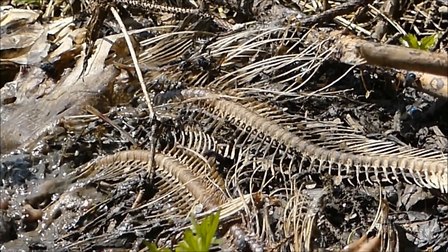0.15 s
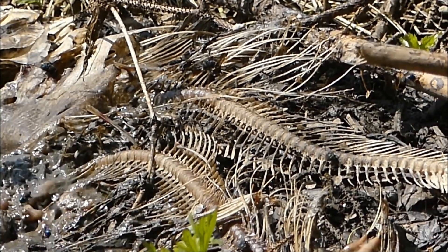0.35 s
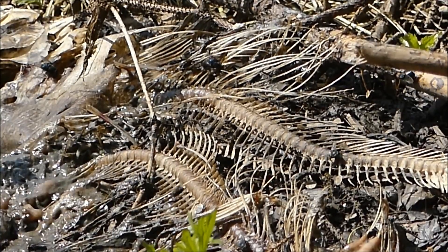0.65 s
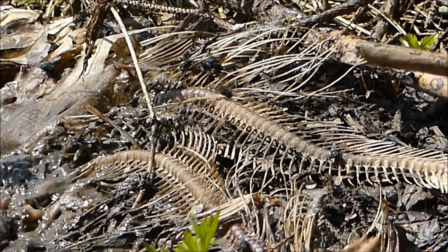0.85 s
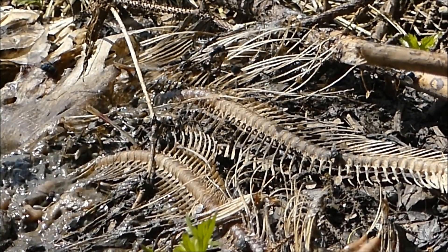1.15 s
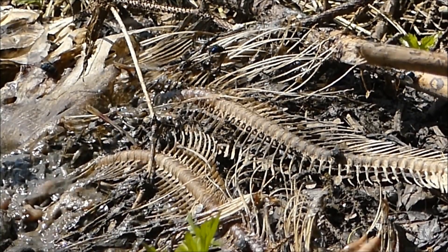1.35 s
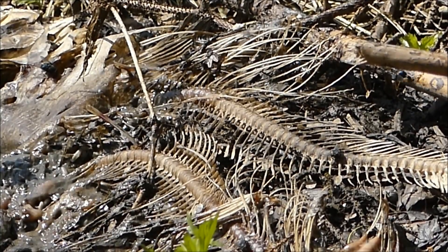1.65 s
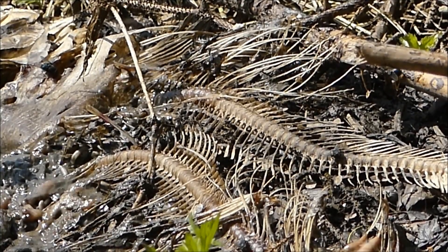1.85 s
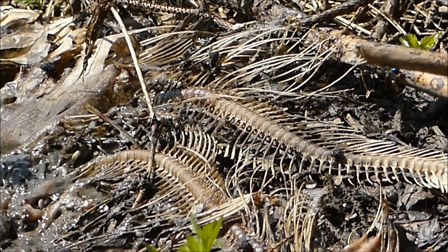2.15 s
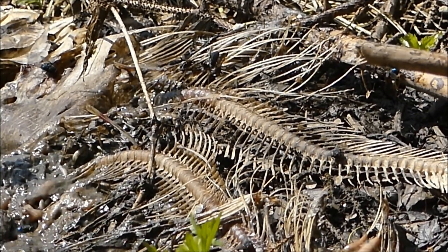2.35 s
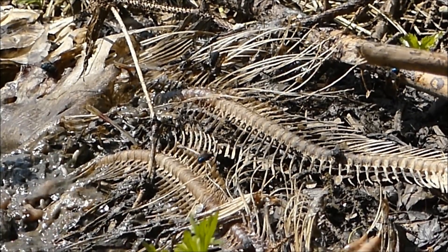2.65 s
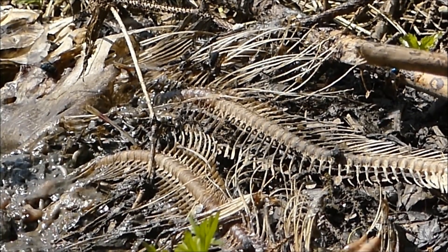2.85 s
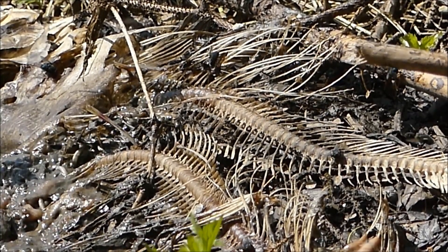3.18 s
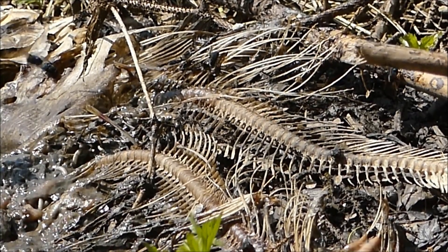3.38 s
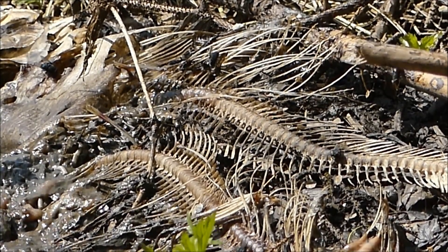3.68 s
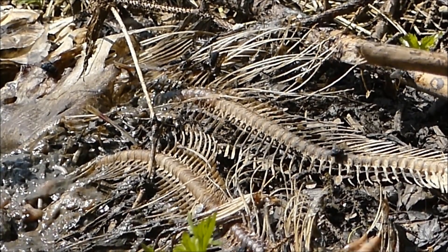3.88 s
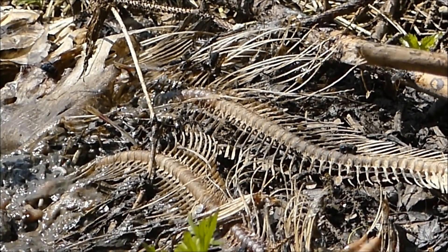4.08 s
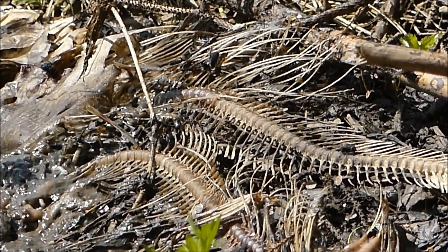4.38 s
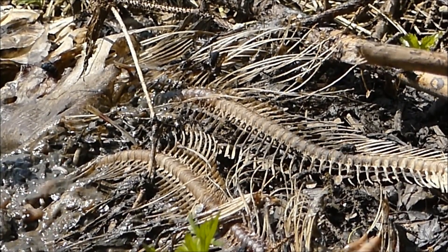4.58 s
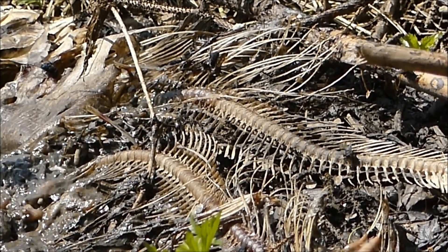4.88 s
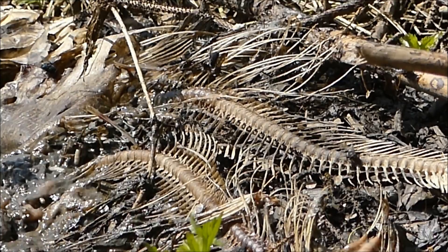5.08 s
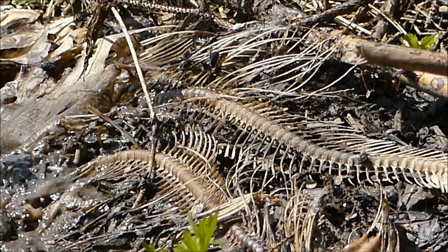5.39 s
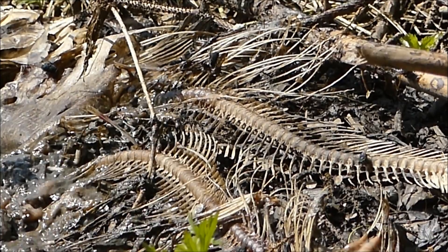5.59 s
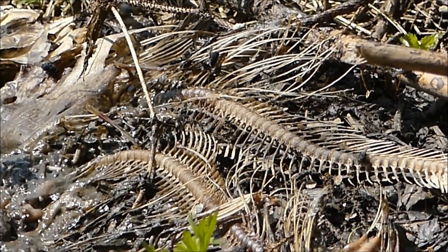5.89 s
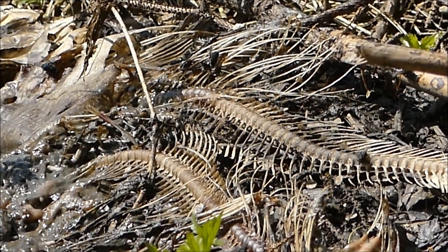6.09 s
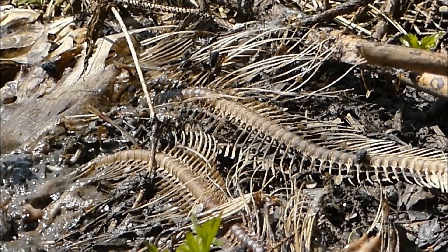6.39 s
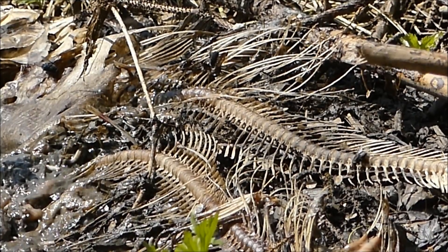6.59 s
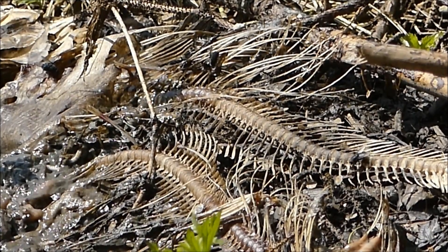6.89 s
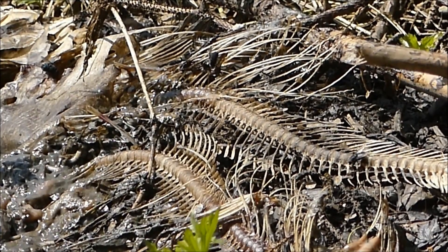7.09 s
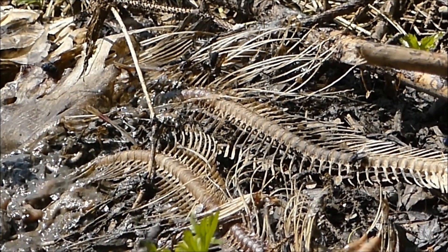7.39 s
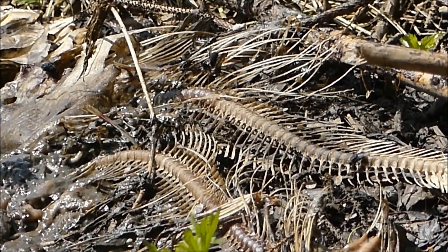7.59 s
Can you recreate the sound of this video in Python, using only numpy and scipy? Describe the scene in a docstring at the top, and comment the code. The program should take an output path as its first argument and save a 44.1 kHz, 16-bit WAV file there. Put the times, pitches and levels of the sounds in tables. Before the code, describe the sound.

In an open wood, a raspy raven and a close, louder raven give short croaks during the first few seconds, one followed by a brief ringing echo. Thin, gliding whines of other birds overlap them above a blurred distant flock. A tiny snap ticks early in wet litter. Later a third raven rattles from farther away. Light breeze puffs bump the microphone near the ground, over soft hiss.

```python
"""A light breeze puffs at a microphone near the ground, over the din of distant birds and a soft hiss.
Thin arching whines of other birds swell and fall; among them one raven rasps, a snap ticks in the wet litter
and a close raven croaks, once with a short ringing echo; later a third rattles from farther off, and faint
croaks come from deeper in the wood. Whines are gliding harmonics, croaks a chopped harmonic voice through
throat and bill, wind short low bursts; the trees throw bird voices back as sparse echoes."""
import sys
import numpy as np
from scipy import signal
from scipy.fft import rfft, irfft, next_fast_len
from scipy.io import wavfile
from scipy.ndimage import map_coordinates

SR = 44100
rng = np.random.default_rng(int(sys.argv[2]) if len(sys.argv) > 2 else 0)


def inscribe(sig):
    """Save sig as 16-bit PCM at rate SR to the path in sys.argv[1].

    A 1-D sig is mono; a 2-D sig holds one channel per row.
    Samples are clipped to [-1, 1] before scaling.
    """
    pcm = np.round(np.clip(np.atleast_2d(sig).T, -1, 1) * 32767)
    wavfile.write(sys.argv[1], SR, pcm.astype(np.int16))


N = 341334
TIME_S = np.arange(N) / SR

# level of the distant flock, before the gains of its users: time_s, level_db
DIN_LEVEL = [(2.1, -46), (4.1, -46), (5.5, -48.5), (6.4, -52.5), (7.2, -49), (7.74, -52)]
# relative spectrum of distant voices: freq_hz, gain_db
DIN_COLOUR = [(250, -38), (450, -6), (750, -4), (1150, 4), (1500, -8), (2050, -12), (2600, -9), (3200, -16),
              (5000, -24), (14000, -38.5)]

# voice of the rasping bird, also used for the distant croaks; see croak()
RASPING_VOICE = dict(
    top_at=0.557, scoop=0.04766, sag=0.0914, glide=0.36, jitter=0.0553, swing=0.16,
    last_rattle_hz=55.9, stagger=0.22, depth=(0.55, 0.48), rough=(0.42, 0.5),
    swell_db=-0.5, fade_db=5.5, uneven_db=1.5, attack_s=0.016,
    open_db=7.5, shut_db_per_s=60, ring_db=4, ring_width_hz=600)


def amp(db):
    """Decibels to gain."""
    return 10 ** (np.asarray(db) / 20)


def evened(x):
    """Scales to rms 1."""
    return x / np.sqrt(np.mean(x ** 2) + 1e-20)


def follow(rows, t_s):
    """Each column of a curve at the times t_s."""
    s, *columns = np.transpose(rows)
    return [np.interp(t_s, s, c) for c in columns]


def read(points, hz):
    """A spectrum interpolated on a log-frequency axis."""
    f, value = np.transpose(points)
    return np.interp(np.log(hz + 1), np.log(f + 1), value)


def colour(x, points):
    """Filters by a spectrum in dB."""
    size = next_fast_len(2 * len(x))
    gain = amp(read(points, np.fft.rfftfreq(size, 1 / SR)))
    return irfft(rfft(x, size) * gain, size)[:len(x)]


def band(x, hz, kind):
    """Steep zero-phase low-, high- or band-pass."""
    return signal.sosfiltfilt(signal.butter(4, hz, kind, fs=SR, output="sos"), x)


def wander(size, hz):
    """Smooth chance of rms 1 that changes about hz times a second."""
    at = np.arange(size) * 2 * hz / SR
    return evened(map_coordinates(rng.standard_normal(int(at[-1]) + 4), [at + 1], order=2))


def add(mix, start_s, sound):
    """Mixes a sound in at start_s."""
    part = mix[max(round(start_s * SR), 0):][:len(sound)]
    part += sound[:len(part)]


def arch(share, top_at, before, after, bend=2.18):
    """How far a gesture lies below its top: by before at its start, by after at its end."""
    top_at = np.clip(top_at, 0.05, 0.95)
    rising = np.maximum(1 - share / top_at, 0) ** bend
    falling = np.maximum((share - top_at) / (1 - top_at), 0) ** bend
    return before * rising + after * falling


def warp(x, speed):
    """Resamples along a curve of speed ratios, which moves pitch and resonances together."""
    return map_coordinates(x, [np.cumsum(speed)], order=3)


def resonate(x, hz, width_hz):
    """A one-pole resonance of gain 1 that follows the curve hz."""
    turn = np.exp(2j * np.pi * np.cumsum(hz) / SR)
    r = np.exp(-np.pi * width_hz / SR)
    return 2 * (turn * signal.lfilter([1 - r], [1, -r], x / turn)).real


def background(din_db=-3, flutter_db=(3, 2.6, 1), hiss_db=-1):
    """The blurred din of the distant flock, each register swelling by itself, over a soft hiss."""
    # time_s, level_db (before hiss_db)
    hiss_level = [(4.18, -60), (4.23, -65), (5.8, -62), (5.95, -66), (7.74, -68.5)]
    # relative spectrum: freq_hz, gain_db
    hiss_colour = [(30, -13), (120, 14.5), (300, -33), (3000, -4), (7500, -6.5), (9800, 7.5), (12000, 3),
                   (15500, 1.5)]
    din = evened(colour(rng.standard_normal(N), DIN_COLOUR))
    low, high = band(din, 850, "low"), band(din, 1900, "high")
    registers = (low, din - low - high, high)
    din = sum(part * amp(db * np.minimum(wander(N, 20), 1)) for part, db in zip(registers, flutter_db))
    hiss = evened(colour(rng.standard_normal(N), hiss_colour))
    din_gain = amp(follow(DIN_LEVEL, TIME_S)[0] + din_db)
    hiss_gain = amp(follow(hiss_level, TIME_S)[0] + hiss_db)
    return din * din_gain + hiss * hiss_gain


def puff(hz, scale_s):
    """A swell of air only a few cycles long, fullest at twice scale_s."""
    u = np.arange(SR // 20) / SR / scale_s
    turns = rng.random() + np.cumsum(hz * (1 + 0.17 * wander(len(u), 219.0))) / SR
    return (u / 2) ** 2 * np.exp(2 - u) * np.sin(2 * np.pi * turns)


def breeze(eddy_db=-2, lump_db=5.0, puff_db=-2, small_db=5.0, spread_db=8,
           low_hz=370, high_hz=520, count=300, thud_hz=170, thud_db=-9):
    """Lumpy low eddies at the microphone, with strong, thudding puffs and many small ones."""
    # strength of the breeze, before the gains above: time_s, level_db
    strength = [(0, -57), (.33, -74.5), (1.64, -79), (2.45, -53.5), (2.76, -66.5), (3.34, -53), (4.12, -65),
                (4.27, -48), (4.94, -58.5), (6.45, -51), (6.85, -64), (6.9, -56.5)]
    # relative eddy spectrum: freq_hz, gain_db
    eddy_colour = [(55, -39), (100, -8.5), (165, 2), (290, -16), (440, -5), (700, -47), (1500, -78)]
    # strongest puffs: start_s, level_db (before puff_db), centre_hz
    strong_puffs = [(0.038, -35.5, 216), (.333, -41.5, 340), (2.289, -39.5, 383), (2.563, -35.5, 234),
                    (2.588, -34, 192), (2.998, -36, 447), (3.946, -37, 396), (4.198, -31, 467),
                    (4.26, -30, 432), (4.289, -34.5, 330), (4.316, -29.5, 490), (4.353, -35, 480),
                    (4.414, -35, 490), (4.597, -34, 490), (5.118, -31.5, 396), (5.426, -32, 480),
                    (5.862, -28.5, 480), (6.105, -39, 412), (6.258, -45, 604), (6.324, -37.5, 169.2),
                    (6.428, -31, 495), (6.888, -30.5, 562), (6.918, -39.5, 485), (6.982, -36, 504),
                    (7.54, -34.5, 430)]
    strength_db = follow(strength, TIME_S)[0]
    lumps = amp(lump_db * np.minimum(wander(N, 35), 1.5))
    out = evened(colour(rng.standard_normal(N), eddy_colour) * lumps) * amp(strength_db + eddy_db)
    for start_s, db, hz in strong_puffs:
        thud = amp(thud_db) * puff(thud_hz, scale_s=0.0025)
        add(out, start_s, amp(db + puff_db) * (puff(hz, scale_s=0.0021) + thud))
    for when, height, size in rng.random((count, 3)):
        gain = amp(strength_db[int(when * N)] + small_db + spread_db * size ** 2)
        hz = low_hz + height * (high_hz - low_hz)
        add(out, when * N / SR, gain * puff(hz, scale_s=0.0017))
    return out


def whine(length_s, top_hz, fall, loudest_at, first_db, octave_db, third_db, scoop=0.012, quaver=0.0034,
          flutter_db=1.85, droop=0.049, rolloff_db=13, waver=0.00489, swell_db_per_s=90, fade_db=8):
    """A thin four-harmonic note that starts nearly level, swells, then arches down and droops as it fades."""
    u = np.linspace(0, 1, int(length_s * SR))
    # the pitch tops before the loudest moment
    hz = top_hz * (1 - arch(u, loudest_at - 0.205, scoop, fall, bend=1.5)) * (1 - droop * u ** 10)
    tremble = 1 + quaver * wander(len(u), 70.7) + waver * wander(len(u), 10.26)
    phase = 2 * np.pi * np.cumsum(hz * tremble) / SR
    harmonics_db = [first_db, octave_db, third_db, third_db - rolloff_db]
    tone = sum(amp(db + flutter_db * wander(len(u), 22.3)) * np.sin((k + 1) * phase)
               for k, db in enumerate(harmonics_db))
    swell = amp(-arch(u, loudest_at, swell_db_per_s * loudest_at * length_s, fade_db))
    return np.sqrt(2) * tone * swell * np.minimum(u / 0.063, 1) * np.minimum((1 - u) / 0.11, 1)


def far_whiners(count=60, low_hz=1090, high_hz=1430, length_s=0.22, fall=0.0613, loudest_at=0.405,
                harmonics_db=(-15, -20, -28)):
    """Faint whines at random times and pitches from deep in the wood, their level following the din's."""
    out = np.zeros(N)
    for when, height in rng.random((count, 2)):
        start_s, hz = when * N / SR, low_hz + height * (high_hz - low_hz)
        levels_db = follow(DIN_LEVEL, start_s)[0] + np.array(harmonics_db)
        add(out, start_s, whine(length_s, hz, fall, loudest_at, *levels_db))
    return out


def whines_and_ring():
    """Whines of the nearer birds, and at 2.17 s a short ringing echo of the close croak, as gliding notes."""
    # start_s, length_s, top_hz, fall (share of pitch), loudest_at (0-1),
    # first_db, octave_db, third_db (before flutter and swell)
    note_rows = [(0.251, 0.079, 1365, 0.024, 0.41, -53, -48, -82),
                 (0.412, 0.27, 1495, 0.1, 0.45, -47.5, -43.5, -60.5),
                 (.828, 0.22, 1253, 0.056, 0.28, -41.5, -40.5, -60.5),
                 (1.002, 0.21, 1493, 0.071, 0.76, -48.5, -41.5, -71),
                 (1.499, 0.25, 1527, 0.091, 0.24, -46, -38, -63),
                 (2.149, 0.16, 1500, 0.083, 0.35, -45, -43, -67),
                 (2.17, 0.06, 1165, 0.011, 0.9, -58, -72, -55),
                 (2.291, 0.091, 1187, 0.03, 0.78, -40.5, -52.5, -74),
                 (2.389, 0.094, 1147, 0.0072, 0.35, -39, -88, -81),
                 (2.41, .26, 1358, .11, 0.31, -46, -48.5, -84),
                 (2.519, 0.14, 1138, 0.06, 0.32, -76, -56, -55.5),
                 (2.52, 0.1, 1266, .05, 0.14, -63, -49.5, -69),
                 (2.895, 0.27, 1232, 0.15, 0.33, -44.5, -46.5, -64),
                 (2.9, 0.25, 1311, .08, 0.32, -50, -46, -58),
                 (3.03, 0.29, 1327, 0.023, 0.52, -48.5, -56.5, -84),
                 (3.58, 0.31, 1307, 0.05, 0.45, -49, -48, -62),
                 (3.68, 0.27, 1350, 0.069, 0.53, -48, -48.5, -75),
                 (3.87, .27, 1125, 0.039, 0.384, -47, -60, -62),
                 (5.037, 0.19, 1282, 0.081, 0.29, -41.5, -53.5, -67),
                 (5.12, 0.32, 1295, 0.075, 0.52, -64, -51.5, -68),
                 (5.89, 0.3, 1296, 0.06, 0.36, -60, -52.5, -67),
                 (6.28, .25, 1336, .06, 0.55, -64, -58.5, -76)]
    out = np.zeros(N)
    for start_s, *row in note_rows:
        add(out, start_s, whine(*row))
    return out


def twigs(x, count=7, spread_s=0.016, size=0.37):
    """Twigs scatter the short waves: a few quick echoes make the sound ragged."""
    out = x.copy()
    for delay, strength in rng.random((count, 2)):
        add(out, delay * spread_s, size * (0.5 + strength) * x)
    return out


def croak(row, throat, mouth, top_at, scoop, sag, last_rattle_hz, depth, rough, ring_db, swell_db, fade_db,
          open_db, shut_db_per_s, jitter, swing, uneven_db, glide, stagger, split=0, gape=0.72,
          half_open_db=-21, chest_rise_db=6, ring_width_hz=170, attack_s=0.005, release_s=0.0066):
    """A harmonic voice, chopped by a slower, uneven rattle of the syrinx and shaped by the throat and bill."""
    # scoop, sag: shares of the top pitch; depth, rough: (at start, at end); top_at: share of the croak
    start_s, length_s, peak_db, peak_at, bright_db, widest_at, chest_db, top_hz, rattle_hz, bill_hz = row
    t = np.arange(0, length_s, 1 / SR)
    size = len(t)
    share, past_widest_s = t / length_s, t - widest_at * length_s

    effort_db = peak_db - arch(share, peak_at, swell_db, fade_db, bend=1.28)
    # treble grows as the bill opens and dies as it shuts
    shut_db = shut_db_per_s * np.maximum(past_widest_s, 0)
    treble_db = bright_db - arch(share, widest_at, open_db, 0) - shut_db - effort_db
    hz = top_hz * (1 - arch(share, top_at, scoop, sag, bend=2.088))
    depth, rough = np.linspace(*depth, size), np.linspace(*rough, size)

    rattle = np.linspace(rattle_hz, last_rattle_hz, size) * (1 + stagger * wander(size, 49.68))
    beat = np.cumsum(rattle) / SR % 1
    burst = np.sin(np.pi * beat ** 0.62) ** 2  # each beat opens faster than it closes
    burst /= burst.mean()

    # the pitch chirps down as the pressure of each beat runs out
    chirp = swing * depth * 2 * (0.38 - beat)
    turns = np.cumsum(hz * (1 + chirp + jitter * wander(size, 130.14))) / SR
    lags = rng.random(size=25)
    tone = evened(sum(np.cos(2 * np.pi * ((k + 1) * turns + lag)) for k, lag in enumerate(lags)))
    # a hard-pushed voice splits: every third cycle is stronger
    tone = evened(tone * (1 + split * np.cos(2 * np.pi * turns / 3)))
    rasp = evened(rng.standard_normal(size) * (2 + np.cos(2 * np.pi * turns)))
    chopping = (1 - depth + depth * burst) * amp(uneven_db * wander(size, 41.3))
    drive = ((1 - rough) * tone + rough * rasp) * chopping

    stretch = 1 + glide * (hz / hz.mean() - 1)  # throat resonances rise and sag along with the pitch
    voice = warp(colour(drive, throat), stretch)
    chest, upper = band(voice, 900, "low"), band(voice, [1380, 2100], "band")
    body = band(voice, 2100, "low")

    edge = twigs(voice - body)
    ring = resonate(edge, bill_hz * stretch, ring_width_hz)
    ring = resonate(ring, bill_hz * stretch, ring_width_hz)
    # the bill rings most where the treble is strongest against the effort
    edge = edge + amp(ring_db + treble_db - treble_db.max()) * ring
    edge = edge / np.std(band(edge, 3200, "high"))

    # the voice sinks into the chest
    body = body + (amp(chest_db + chest_rise_db * (share - 1.5)) - 1) * chest
    # a gaping bill lifts the third harmonic
    body = body + (amp(gape * (treble_db - half_open_db)) - 1) * upper
    if mouth:
        mouth_rest_hz = 1137
        body = warp(body, follow(mouth, start_s + t)[0] / mouth_rest_hz)
    fade = np.minimum(t / attack_s, 1) * np.minimum((length_s - t) / release_s, 1)
    return amp(effort_db) * (evened(body) + amp(treble_db) * edge) * fade


def raven(calls, throat, voice, level_db, mouth=None):
    """All the croaks of one bird, sharing a throat and a voice."""
    out = np.zeros(N)
    for row in calls:
        add(out, row[0], croak(row, throat, mouth, **voice))
    return amp(level_db) * out


def rasping_raven():
    """A rough voice with a narrow treble, from a throat that rings mainly near 1.1 kHz."""
    # start_s, length_s, effort_db (before level_db), peak_at (0-1), treble_db (before level_db),
    # widest_at (0-1), chest_db (relative, below 900 Hz), top_hz (before the glide),
    # first_rattle_hz, bill_ring_hz (before the glide)
    calls = [(.508, .195, -32.5, 0.13, -54.5, 0.62, -2, 573.7, 48.06, 5060),
             (1.565, .24, -36.5, 1, -56, 0.71, -4.5, 520.4, 44.06, 5170),
             (3.318, .225, -31, 0.47, -56, 0.92, -7, 576.5, 44.86, 5400),
             (4.503, .185, -40.5, 1, -62.5, 1, -6.5, 536.4, 43.33, 5400)]
    # freq_hz, gain_db (relative)
    throat = [(280, -30), (480, 3), (800, -6), (1130, 7), (1520, -1.5), (2000, -17.5), (2400, -17.5),
              (2900, -28), (4800, -33), (5400, -33), (6000, -37), (12000, -74)]
    return raven(calls, throat, RASPING_VOICE, level_db=1.0)


def snaps(level_db=-6, ring_s=0.00093):
    """A tiny snap in the wet litter: a very short, high tick of decaying noise."""
    # start_s, level_db (before the level above and the high-pass)
    snap_rows = [(0.9266, -25.5)]
    out, t = np.zeros(N), np.arange(SR // 100) / SR
    for start_s, db in snap_rows:
        add(out, start_s, amp(db + level_db) * rng.standard_normal(len(t)) * np.exp(-t / ring_s))
    return band(out, 7200, "high")


def near_raven():
    """A hard-pushed, splitting voice whose main throat resonance lurches during each croak."""
    # columns as in rasping_raven: start_s, length_s, effort_db, peak_at, treble_db, widest_at,
    # chest_db, top_hz (before glide and mouth), first_rattle_hz, bill_ring_hz
    calls = [(1.177, 0.13, -23, 0.31, -35.5, 0.32, 10.5, 576.4, 36, 2790),
             (2.024, .192, -17.5, 0.37, -31.5, 0.66, -2.5, 573.5, 54, 3420),
             (2.651, 0.19, -20, 0.27, -34.5, 0.18, 2, 569.2, 66.6, 4480)]
    # freq_hz, gain_db (relative)
    throat = [(280, -70), (480, 1.5), (640, -2.5), (790, -0.5), (1030, 0), (1120, 6.5), (1250, 1),
              (1420, -12.5), (1650, -16.5), (1950, -26), (2400, -13), (2850, -4.5), (3400, -12.5),
              (4400, -17.5), (6200, -28), (8000, -43), (12000, -45.5), (15000, -74)]
    # main throat resonance, before the glide: time_s, resonance_hz
    mouth = [(1.18, 1033), (1.21, 1156), (1.238, 1143), (1.258, 1323), (1.277, 1012), (2.03, 1386),
             (2.052, 1313), (2.064, 1096), (2.15, 1130), (2.2, 1056), (2.672, 997), (2.695, 1152),
             (2.78, 1107), (2.84, 1050)]
    voice = dict(
        top_at=0.62, scoop=0.0499, sag=0.1, glide=0.424, jitter=0.0301, swing=0.0544,
        last_rattle_hz=74.5, stagger=0.25, depth=(0.55, 0.35), rough=(0.45, 0.3), split=0.45,
        swell_db=8, fade_db=7.5, uneven_db=1.83, release_s=0.037,
        open_db=16.5, shut_db_per_s=188, ring_db=3, ring_width_hz=450)
    return raven(calls, throat, voice, level_db=-2.0, mouth=mouth)


def distant_raven():
    """Faint croaks from deeper in the wood: the rasping voice through the colour of the din."""
    # columns as in rasping_raven: start_s, length_s, effort_db, peak_at, treble_db, widest_at,
    # chest_db, top_hz, first_rattle_hz, bill_ring_hz
    calls = [(4.39, 0.0925, -42, 0.27, -65.5, 0.25, 4.2, 520.6, 43, 2780),
             (7.64, .11, -48.5, 0.74, -64, 0.61, 1, 574, 44.5, 2270)]
    return raven(calls, DIN_COLOUR, RASPING_VOICE, level_db=-2.0)


def far_raven():
    """A rattle from farther off: beats chopped fully at first, then ever shallower and faster."""
    # columns as in rasping_raven: start_s, length_s, effort_db, peak_at, treble_db, widest_at,
    # chest_db, top_hz, first_rattle_hz, bill_ring_hz
    calls = [(5.665, .21, -19, 0.23, -44, 0.84, -1.5, 587, 55.8, 3030),
             (6.518, .21, -21, 0.68, -45, 0.78, -2.5, 561.7, 44.25, 3060),
             (7.332, .228, -27.5, 0.64, -46.5, 0.98, -7, 561, 50.16, 3190)]
    # freq_hz, gain_db (relative)
    throat = [(280, -34), (540, -11), (760, -6), (1000, -3), (1130, 2.5), (1680, -9.5), (2150, -27),
              (3100, -14.5), (4500, -21), (5100, -32), (6400, -29), (11000, -88)]
    voice = dict(
        top_at=0.63, scoop=0.085, sag=0.19, glide=0.508, jitter=0.019, swing=0.19,
        last_rattle_hz=82.5, stagger=0.05, depth=(1, 0.1), rough=(0.22, 0.2),
        swell_db=11.5, fade_db=13, uneven_db=0.7, open_db=27.5, shut_db_per_s=82, ring_db=2.5)
    return raven(calls, throat, voice, level_db=-7.0)


def trees(x, build_s=0.0025, trunk_db=4):
    """Sparse echoes off trunks, a few of them strong, each band dying at its own rate."""
    # reverberation: freq_hz, decay_s (to -60 dB)
    decay = [(300, 1), (1100, 0.81), (3000, 0.89), (12000, 0.7)]
    size = 3 * SR // 2
    hits = rng.random(size) < 900 / SR  # about 900 echoes a second
    taps = rng.choice([-1, 1], size) * hits * amp(trunk_db * rng.standard_normal(size))
    taps *= 1 - np.exp(-np.arange(size) / SR / build_s)
    hz, t, z = signal.stft(taps, SR, nperseg=256)
    tail = signal.istft(z * amp(-60 * t / read(decay, hz)[:, None]), SR, nperseg=256)[1]
    return signal.fftconvolve(x, tail / np.linalg.norm(tail))[:N]


def scene():
    """Sums wind, din and birds; each bird sends its own share by way of the trees."""
    backdrop = background()
    wind = band(breeze(), 80, "high")
    far_whines, notes = far_whiners(), whines_and_ring()
    rasping = rasping_raven()
    snap = snaps()
    near, distant, far = near_raven(), distant_raven(), far_raven()

    to_trees = amp(-12.5) * near + amp(-3.0) * rasping + amp(-4.5) * far
    to_trees = to_trees + amp(-7) * notes + amp(1.0) * (far_whines + distant)
    echoes = trees(to_trees)
    # the nearest thicket answers first
    add(echoes, 0.05, twigs(amp(-18.0) * near + amp(-13) * rasping))
    # the edge of the wood repeats the far rattle and the thin notes
    add(echoes, 0.16, twigs(amp(-19.0) * far + amp(-18.5) * notes))

    birds = near + rasping + far + distant + notes + echoes
    return (birds + wind + snap + backdrop)[None]


def record(dry):
    """The recorder's band limit: a linear-phase low-pass."""
    edge_hz = 15700
    lowpass = signal.firwin(511, edge_hz, window=("kaiser", 9), fs=SR)
    return signal.oaconvolve(dry, lowpass[None], "same")


dry = scene()
out = record(dry)
inscribe(out)
```